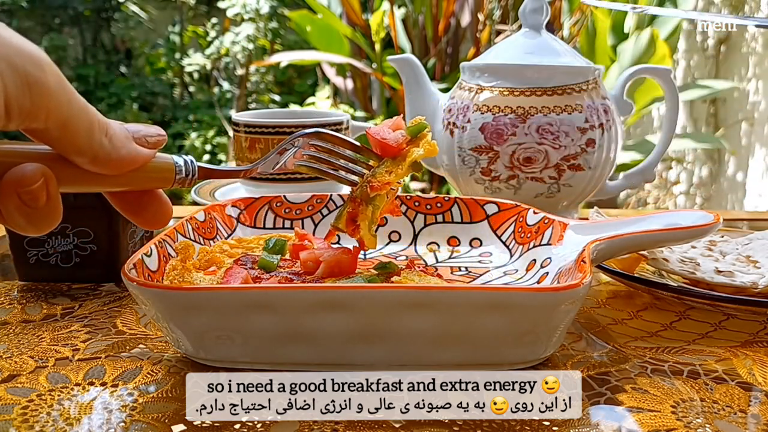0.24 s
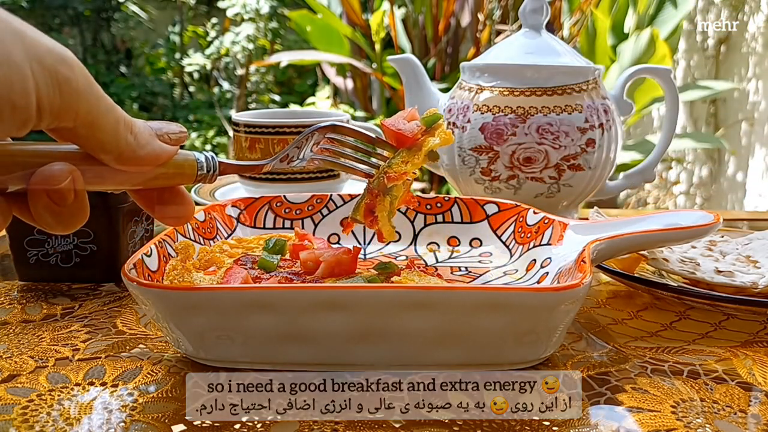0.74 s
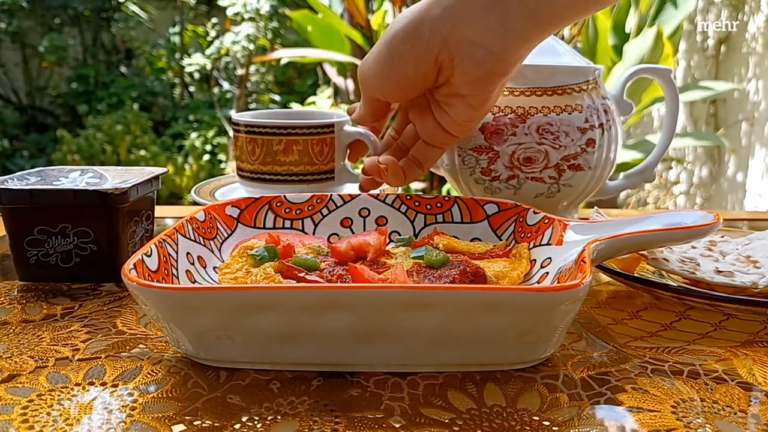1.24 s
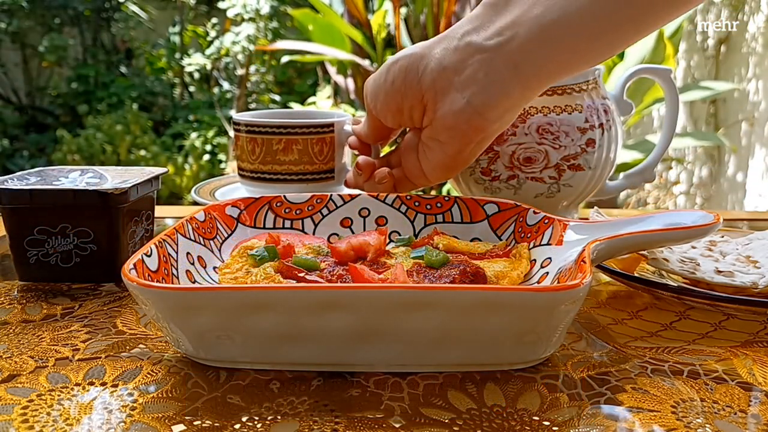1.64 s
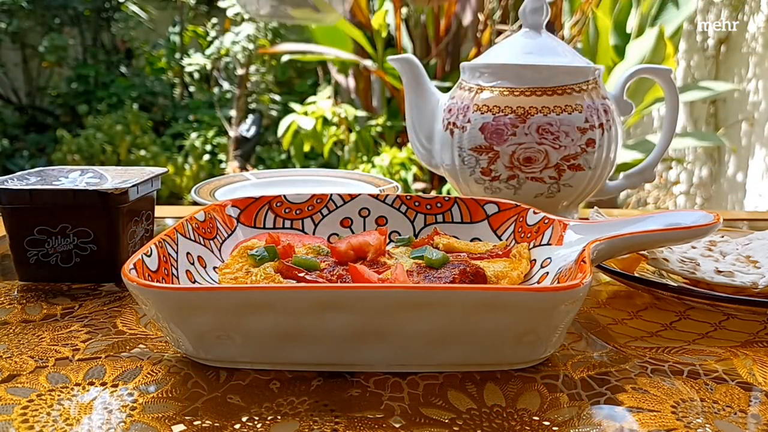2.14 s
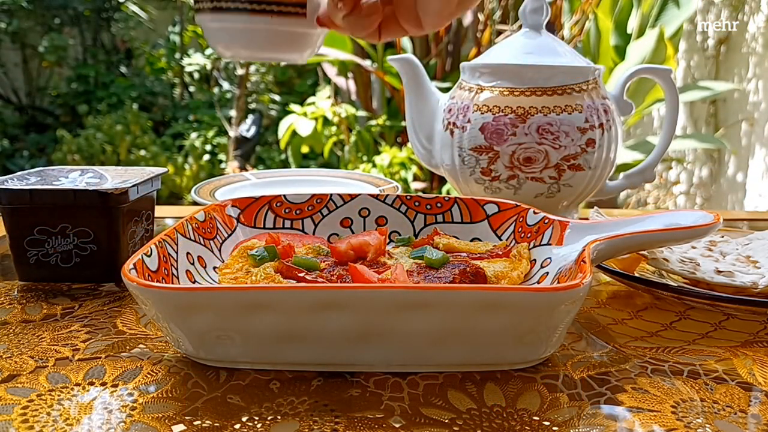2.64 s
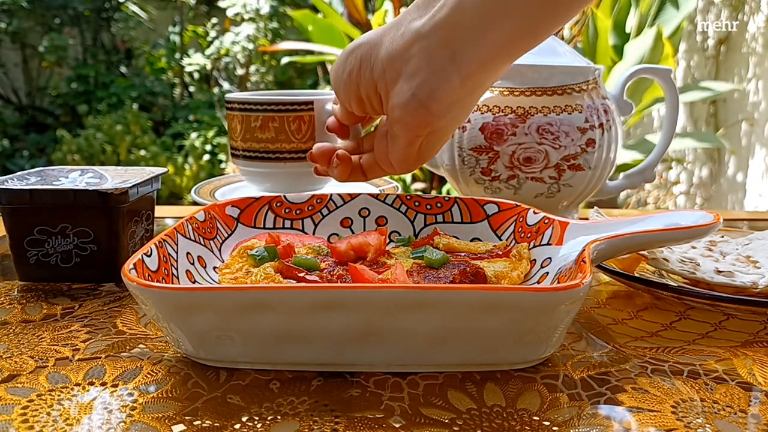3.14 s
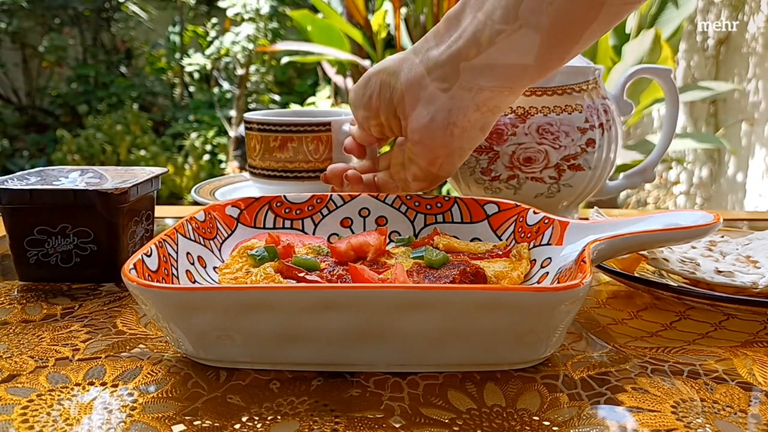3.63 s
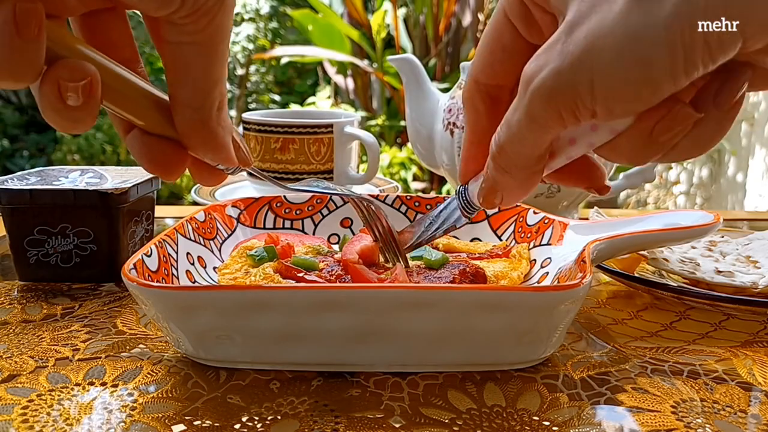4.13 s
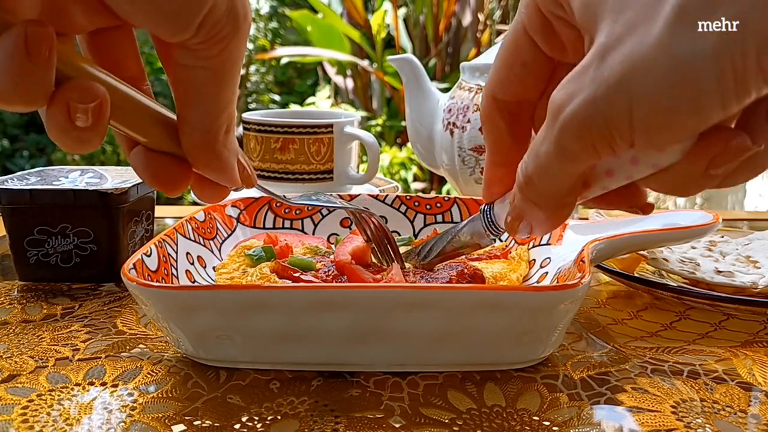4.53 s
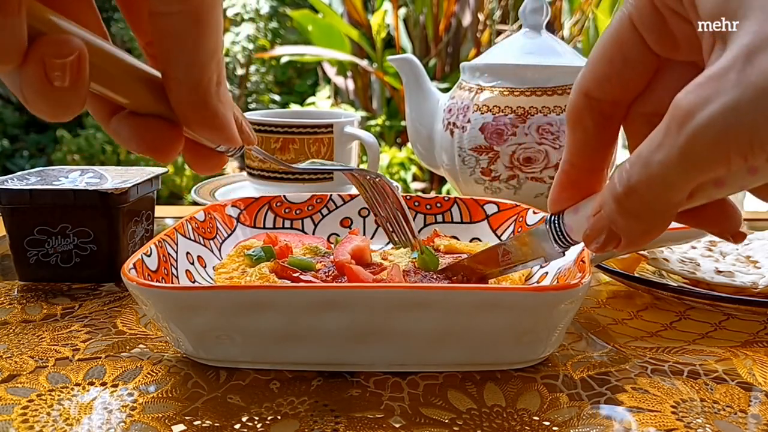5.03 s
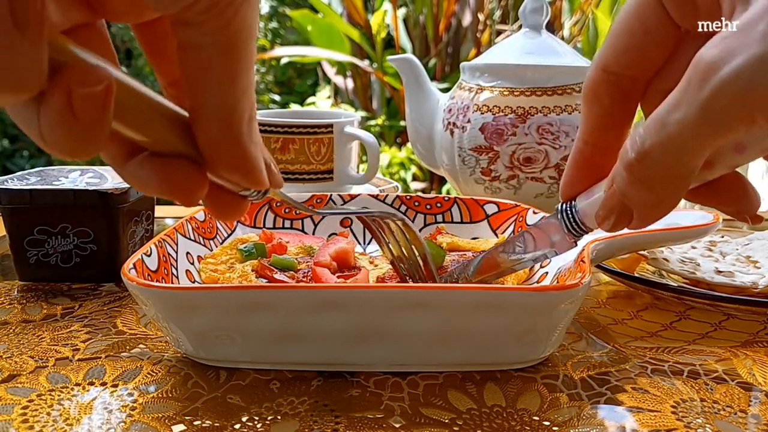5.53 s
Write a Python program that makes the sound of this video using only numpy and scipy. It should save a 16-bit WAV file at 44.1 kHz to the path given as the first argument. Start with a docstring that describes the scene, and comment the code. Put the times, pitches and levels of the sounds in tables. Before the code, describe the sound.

Distant traffic hums around a garden table as a china cup is lifted and set down and a fork and knife clink.

```python
"""Far traffic hums behind a garden breakfast table, louder in the middle stretch. Close by, a cup rings as it
leaves its saucer and rattles back; then fork and knife clink in a ceramic dish and jolt the table as the
traffic grows quieter again. Each contact is a short chatter that rings the modes of china or table top, with a
crack and a brief tail. The background is shaped noise: engine throb, tyre roar, garden hush, thin whistles and
one far chirp."""
import sys
import numpy as np
from scipy import signal
from scipy.fft import rfft, irfft
from scipy.io import wavfile
from scipy.ndimage import uniform_filter1d

SR = 44100
rng = np.random.default_rng(int(sys.argv[2]) if len(sys.argv) > 2 else 0)


def inscribe(sig):
    """Save sig as 16-bit PCM at rate SR to the path in sys.argv[1].

    A 1-D sig is mono; a 2-D sig holds one channel per row.
    Samples are clipped to [-1, 1] before scaling.
    """
    pcm = np.round(np.clip(np.atleast_2d(sig).T, -1, 1) * 32767)
    wavfile.write(sys.argv[1], SR, pcm.astype(np.int16))


N = 254456

# The long ring of the free cup. Each row: pitch in Hz, level in dB, t60 in seconds.
CUP_MODES = [(1971, -17, .75), (1998, -18, .35), (4931, -9, .16), (7520, -7, .15), (7585, -14, .14),
             (11570, -25, .13), (12830, -17, .12)]
# The lift. Each row: start in seconds, level in dB, hardness in dB per octave, chatter in seconds.
CUP_LIFT = [(1.753, -37.5, 0.5, 0.003)]


def cup():
    """The lifted cup rings free, its close pairs of modes beating."""
    return strike(CUP_MODES, CUP_LIFT, spread_db=-1.5, blur=0, touch_s=0.00063,
                  grit_db=-20.0, grit_hz=7800, pan_db=-3.0, cluster=1)


# The choked ring of cup on saucer. Each row: pitch in Hz, level in dB, t60 in seconds.
SAUCER_MODES = [(1968, -7, .26), (2015, -11, .06), (4990, -17, .13), (5040, -10, .08), (7585, -16, .09),
                (7750, -18, .05), (9776, -32, .1), (11600, -26, .09), (13000, -37, .07)]
# The rattles. Each row: start in seconds, level in dB, hardness in dB per octave, chatter in seconds.
SAUCER_TOUCHES = [(1.636, -67.5, -5, 0.016), (1.66, -77, 0, 0.007), (3.476, -48.5, -2, 0.027),
                  (3.585, -49, -14, 0.015), (3.721, -49.5, -7.5, 0.011), (3.824, -51.5, -1.5, 0.02),
                  (3.877, -60.5, 0.5, 0.017)]


def saucer():
    """Cup and saucer touch and ring briefly together, with a new colour at each touch."""
    return strike(SAUCER_MODES, SAUCER_TOUCHES, spread_db=5.5, blur=.003, touch_s=0.00024,
                  grit_db=-22.0, grit_hz=6000, pan_db=-2.0, cluster=3)


# The tight, bright voice of the dish. Each row: pitch in Hz, level in dB, t60 in seconds.
DISH_MODES = [(1600, -5, 0.02), (2250, -5, 0.074), (2448, 2.5, 0.026), (2594, -2, 0.03),
              (2726, -11.5, 0.048), (3806, -15, 0.078), (4115, -12, 0.044), (4398, -1, 0.041),
              (4853, 0, 0.027), (5800, -29.5, 0.035), (7900, -13.5, 0.044), (7820, -2.5, 0.0093),
              (8830, -8, .028), (10680, -6, 0.042), (11510, -15, .03), (11900, -10.5, 0.049),
              (14400, -18, .04)]
# Cutlery hits. Each row: start in seconds, level in dB, hardness in dB per octave, chatter in seconds.
CUTLERY_CLINKS = [(0.4135, -84, 1, 0.0019), (4.141, -69.5, -1, 0.027), (4.363, -40, 1.5, 0.0029),
                  (4.412, -58, -6.5, 0.0027), (4.569, -33, 0, 0.00062), (4.735, -78, 6, 0.0076),
                  (4.753, -73.5, 1, 0.0087), (4.866, -73, -1.5, 0.0067), (4.878, -68.5, -3, 0.0044),
                  (5.275, -75.5, -1, 0.017), (5.298, -72, 0, 0.0091), (5.335, -74.5, -5, 0.02),
                  (5.578, -51, 1, 0.0033)]


def dish():
    """Fork and knife strike the ceramic, whose modes die almost at once."""
    return strike(DISH_MODES, CUTLERY_CLINKS, spread_db=0.5, blur=.025, touch_s=0.0018,
                  grit_db=1.5, grit_hz=11100, pan_db=0.1, cluster=5)


# The body of the table top. Each row: pitch in Hz, level in dB, t60 in seconds.
TABLE_MODES = [(150.3, -18.5, 0.11), (250, -7.5, 0.023), (319, -2.5, 0.04), (395.4, -8.5, 0.083),
               (523, -6.5, 0.088), (614.3, -3, 0.045), (783, 0, 0.018), (990, -1.5, 0.021),
               (1297, -4.5, 0.039), (1510, -4.5, 0.033), (2180, -10, 0.077), (2430, -17, 0.044),
               (2844, -18.5, 0.055), (3530, -17, 0.018), (4690, -25.5, 0.052)]
# Jolts. Each row: start in seconds, level in dB, hardness in dB per octave, low thud gain in dB.
TABLE_KNOCKS = [(1.174, -70, -7.5, -8), (1.745, -44, -2.5, -19), (1.755, -40.5, -4.5, -27),
                (3.476, -39, -1, -10), (3.488, -50.5, -3.5, -15), (3.582, -33.5, 1, -6),
                (3.723, -55, -3, -12), (3.825, -51.5, -3, -19), (3.836, -50.5, -2.5, -11),
                (3.877, -55.5, 1, -11), (4.054, -73.5, -3.5, -21), (4.095, -59.5, -3, -21),
                (4.129, -48.5, 1.5, -4.5), (4.139, -56, -4, -0.5), (4.238, -55.5, -1, 7),
                (4.372, -39.5, 0, -1), (4.386, -61, -4.5, 1.5), (4.411, -42, -1, -4),
                (4.572, -63, -7, -3.5), (4.591, -54, -5, -11), (4.608, -49.5, -1, 2.5),
                (4.738, -67, -1.5, -8), (5.708, -74.5, -1, -10)]
# Short drags. Each row: start in seconds, level in dB, length in seconds.
TABLE_SLIDES = [(2.878, -55, 0.091), (4.979, -65.5, 0.096), (5.627, -70.5, 0.046)]


def table(knock_chatter_s=0.0064, slide_hard_db=-2.5):
    """Knocks pass into the table top; something dragged across it rings it with a longer chatter."""
    knocks = [(s, db, hard_db, knock_chatter_s, thud_db) for s, db, hard_db, thud_db in TABLE_KNOCKS]
    slides = [(s, db, slide_hard_db, length_s) for s, db, length_s in TABLE_SLIDES]
    return strike(TABLE_MODES, knocks + slides, spread_db=1.0, blur=.075, touch_s=0.00062,
                  grit_db=10.5, grit_hz=2370, pan_db=-1.3, cluster=5)


# Width: the ring that is out of step at the two microphones. Each row: frequency in Hz, level in dB.
RING_WIDTH = [(200, -25.5), (700, -13.5), (1300, -5), (2500, 4), (4500, 0), (8000, -4.5), (13000, 1.5)]


def strike(modes, contacts, spread_db, blur, touch_s, grit_db, grit_hz, pan_db, cluster, thud_hz=350):
    """Each contact chatters and rings the modes, each a cluster whose pitches scatter by blur."""
    hz, db, t60 = np.transpose(np.repeat(modes, cluster, axis=0))[:, :, None]
    t = np.arange(round(min(0.71 * t60.max() + .02, .45) * SR)) / SR
    contact_t = np.arange(8000) / SR
    decay = np.log(1000) / t60
    rise = np.sin(np.pi / 2 * np.minimum(t / touch_s, 1)) ** 2  # the blow takes a moment
    out = np.zeros((2, N))
    for s, level_db, hard_db, chatter_s, *thud_db in contacts:
        spot, detune, start, turn = rng.standard_normal((4, *hz.shape))
        colour_db = hard_db * np.log2(hz / 2000) + sum(thud_db) * (hz < thud_hz)
        strength = gain_of(db + colour_db + spread_db * spot)[:, 0]  # the spot hit changes the mix
        phase = 2 * np.pi * (hz * (1 + blur * detune) * t + .06 * start)
        ring = np.exp(1j * phase - decay * t)
        width = (gain_of(read(RING_WIDTH, hz)) * np.exp(.5j * turn))[:, 0]
        mid = rise * (strength @ ring).imag
        side = rise * (strength * width @ ring).real

        pace = contact_t / chatter_s
        slips, grit_mid, grit_side = rng.standard_normal((3, len(pace))) * gain_of(-12 * pace)
        force = .5 * slips * (rng.random(len(pace)) < .06) * np.minimum(2 * pace, 1)  # sparse rebounds
        force[0] = np.exp(-chatter_s / 0.025)  # a slide has no sharp first touch
        force /= np.linalg.norm(force)
        sound = signal.oaconvolve([mid + side, mid - side], force[None], axes=1)

        # The many small modes merge into one broad crack.
        top_hz = min(grit_hz * gain_of(hard_db), SR * .45)
        band = signal.butter(3, [300, top_hz], "band", fs=SR, output="sos")
        grit = grit_mid + 0.39 * np.outer([1, -1], grit_side)
        crack = signal.sosfilt(band, grit * np.minimum(2 * pace + force[0], 1))
        sound[:, :len(pace)] += gain_of(grit_db) * crack / (chatter_s / 0.0097) ** .5
        add(out, s, gain_of(level_db) * sound)
    return out * gain_of([[pan_db / 2], [-pan_db / 2]])


# The treble leans right. Each row: frequency in Hz, left minus right in dB.
TREBLE_PAN = [(1000, 1.5), (4500, -2.5), (7000, -6), (14000, -3.5)]


def tableware():
    """All the close sounds, panned by frequency, with the deep bass taken off."""
    hits = cup() + saucer() + dish() + table()
    pan = gain_of(np.outer([.5, -.5], read(TREBLE_PAN, np.fft.rfftfreq(N, 1 / SR))))
    panned = irfft(rfft(hits) * pan, N)
    return signal.sosfilt(signal.butter(2, 110., "high", fs=SR, output="sos"), panned)


# The length of the tail. Each row: frequency in Hz, t60 in seconds.
TAIL_DECAY = [(200, 0.18), (1000, 0.16), (4000, 0.16), (12000, 0.13)]


def outdoor_tail(x):
    """A short, diffuse outdoor tail, each band dying at its own speed."""
    taps = np.zeros((2, SR // 2))
    slots = np.arange(100, SR // 2 - 20, 20)
    arrivals = slots + rng.integers(0, 20, (2, len(slots)))
    np.put_along_axis(taps, arrivals, rng.choice([-1., 1.], arrivals.shape), 1)
    hz, t, bands = signal.stft(taps, SR, nperseg=256)
    fade = gain_of(-60 * t / read(TAIL_DECAY, hz)[:, None])
    tail = signal.istft(bands * fade, SR, nperseg=256)[1]
    return signal.fftconvolve(x, tail / np.linalg.norm(tail[0]), axes=1)[:, :N]


# The loudness of the traffic roar. Each row: time in seconds, level in dB.
ROAR_LEVEL = [(0.0, -69.5), (0.27, -69.5), (0.54, -76.5), (0.71, -63.5), (1.01, -54.5), (1.3, -51),
              (1.77, -48), (2.2, -53), (2.47, -48), (3.12, -46.5), (3.65, -48.5), (3.92, -56.5),
              (4.98, -69.5), (5.59, -72.5), (5.77, -69)]
# The colours of tyres and engines. Each row: frequency in Hz, relative level in dB.
TYRE_SPECTRUM = [(150, -38), (175, -28.5), (220, 3), (255, -5.5), (290, -0.5), (350, -12), (450, -16.5),
                 (700, -12.5), (1390, -21.5), (2200, -38.5), (3500, -48), (5800, -51.5), (7200, -49.5),
                 (14000, -60), (15900, -88)]
ENGINE_SPECTRUM = [(18, -54), (30, -16.5), (48, -13), (81, 0), (126, 1), (167, -12), (200, -21.5),
                   (260, -37.5), (440, -120)]
# Engines surge or ease off. Each row: centre in seconds, gain in dB, half width in seconds.
ENGINE_SURGES = [(.46, -8.5, 0.28), (1.299, 4.5, 0.74), (3.121, 5.5, 0.14), (4.9, 2.5, 0.13)]
# The glide of the throb. Each row: time in seconds, pitch in Hz.
ENGINE_PITCH = [(0, 123.2), (.8, 108.2), (2.4, 83), (3.6, 92.3), (4.1, 110.3), (5.77, 109.7)]


def traffic(quiet_roar_db=-70, quiet_engine_db=-57, engine_follow=0.44):
    """Traffic roar, louder in the middle and quieter at both ends; a low throb partly follows it."""
    t = np.arange(N) / SR
    roar_db = np.interp(t, *np.transpose(ROAR_LEVEL))
    surge_db = sum(db * np.exp(-((t - s) / half_s) ** 2) for s, db, half_s in ENGINE_SURGES)
    engine_db = quiet_engine_db + engine_follow * (roar_db - quiet_roar_db) + surge_db
    pitch_hz = np.interp(t, *np.transpose(ENGINE_PITCH))
    rumble = shaped_noise(ENGINE_SPECTRUM, patchy_db=-1.5, size=4096)
    throb = resonate(rumble, pitch_hz, width_hz=4.9)
    throb = unit_rms(resonate(throb, pitch_hz, width_hz=21.0))
    tyres = shaped_noise(TYRE_SPECTRUM, patchy_db=0.5, size=2048)
    return gain_of(engine_db) * unit_rms(throb + 2.0 * rumble) + gain_of(roar_db) * tyres


# The dark bed of garden air. Each row: frequency in Hz, relative level in dB.
HUSH_SPECTRUM = [(170, -13), (220, -6.5), (400, -20.5), (750, -26), (1300, -36.5), (2130, -36),
                 (3010, -43.5), (6590, -43.5), (15500, -42), (15850, -75)]


def garden_hush():
    """A soft, steady noise under everything."""
    return gain_of(-67) * shaped_noise(HUSH_SPECTRUM, patchy_db=1.6, size=1024)


# Thin tones. Each row: pitch in Hz, bandwidth in Hz, level in dB.
WHISTLE_TONES = [(1040, 4.3, -84), (2136, 10, -91.5), (5040, 24, -92)]


def whistles():
    """Noise through narrow resonances makes faint tones that waver."""
    return sum(gain_of(db) * unit_rms(resonate(rng.standard_normal((2, N)), hz, width_hz))
               for hz, width_hz, db in WHISTLE_TONES)


# A far call. Each row: start and length in seconds, first and last pitch in Hz, level in dB.
BIRD_CHIRPS = [(0.278, 0.21, 5100, 4940, -82)]


def bird():
    """A fuzzy, distant chirp: noise through a slightly falling resonance."""
    out = np.zeros((2, N))
    for s, length_s, from_hz, to_hz, db in BIRD_CHIRPS:
        n = round(length_s * SR)
        tone = resonate(rng.standard_normal((2, n)), np.linspace(from_hz, to_hz, n), width_hz=300.)
        add(out, s, gain_of(db) * unit_rms(tone) * np.hanning(n))
    return out


# The noise beds: centred bass, wide treble. Each row: frequency in Hz, left-right correlation.
STEREO_LIKENESS = [(60, 0.98), (180, 0.93), (550, 0.33), (1650, -0.27), (4970, 0.16), (15000, -0.81)]


def shaped_noise(spectrum, patchy_db, size):
    """Stereo noise from random short-time spectra with drifting louder and softer patches."""
    frames, hz = 4 * N // size + 5, np.fft.rfftfreq(size, 1 / SR)
    left_re, left_im, apart_re, apart_im, patches = rng.standard_normal((frames, len(hz), 5)).T
    patches = uniform_filter1d(patches, size=8, axis=0)  # smooth across frequency
    patches = unit_rms(uniform_filter1d(patches, size=14 * 1024 // size, axis=1))  # and over time
    likeness = read(STEREO_LIKENESS, hz)[:, None]
    left = left_re + 1j * left_im
    right = likeness * left + np.sqrt(1 - likeness ** 2) * (apart_re + 1j * apart_im)
    bands = np.array([left, right]) * gain_of(read(spectrum, hz)[:, None] + patchy_db * patches)
    return unit_rms(signal.istft(bands, nperseg=size, noverlap=size * 3 // 4)[1][:, :N])


def resonate(x, hz, width_hz):
    """A resonance that can glide: shifts hz down to zero, smooths, and shifts back."""
    carrier = np.exp(2j * np.pi * np.cumsum(hz * np.ones(x.shape[-1])) / SR)
    pole = np.exp(-np.pi * width_hz / SR)
    return 2 * (carrier * signal.lfilter([1 - pole], [1, -pole], x / carrier)).real


def gain_of(db):
    """Turns dB into a factor."""
    return 10 ** (np.asarray(db) / 20)


def unit_rms(x):
    """Scales to rms 1."""
    return x / np.sqrt(np.mean(x ** 2) + 1e-20)


def read(points, hz):
    """Reads a table on a log-frequency axis."""
    point_hz, value = np.transpose(points)
    return np.interp(np.log(hz + 1), np.log(point_hz + 1), value)


def add(mix, s, sound):
    """Mixes a two-channel sound in at s seconds."""
    part = mix[:, round(s * SR):][:, :sound.shape[1]]
    part += sound[:, :part.shape[1]]


def scene():
    """Tableware and its short tail up front, the far sounds behind and slightly to the right."""
    near = tableware()
    far = traffic() + garden_hush() + whistles() + bird()
    return near + gain_of(-10.0) * outdoor_tail(near) + far * gain_of([[-.8], [.8]])


def record(dry):
    """The microphones lose the deep bass; a steep band limit takes off the highest treble."""
    thin = signal.sosfilt(signal.butter(3, 55., "high", fs=SR, output="sos"), dry)
    band_limit = signal.firwin(511, 16600, window=("kaiser", 9), fs=SR)
    return signal.oaconvolve(thin, band_limit[None], "same")


dry = scene()
out = record(dry)
inscribe(out)
```